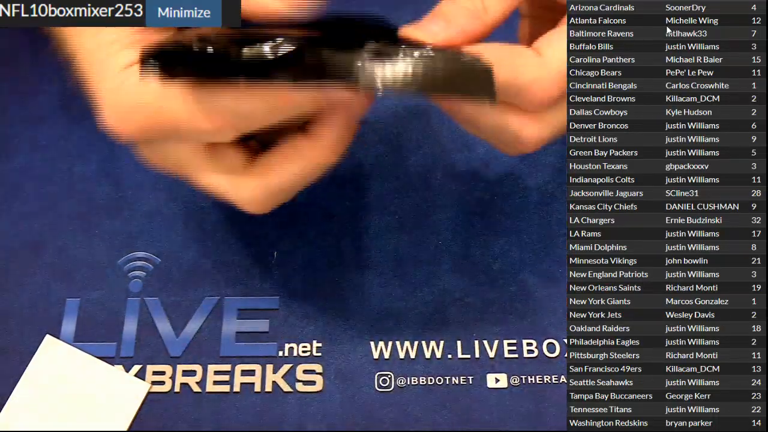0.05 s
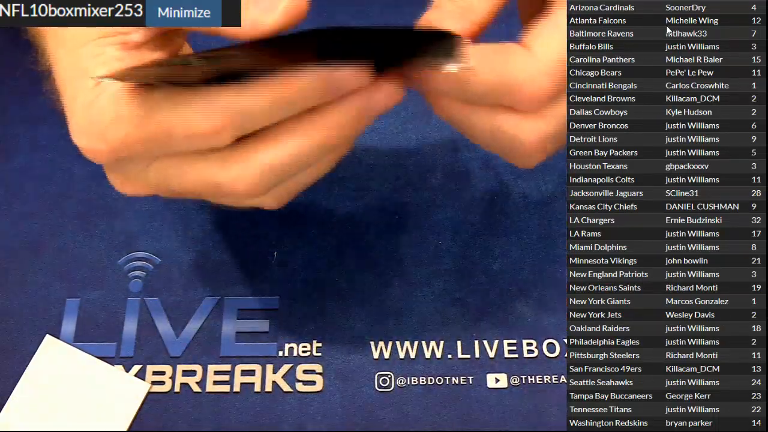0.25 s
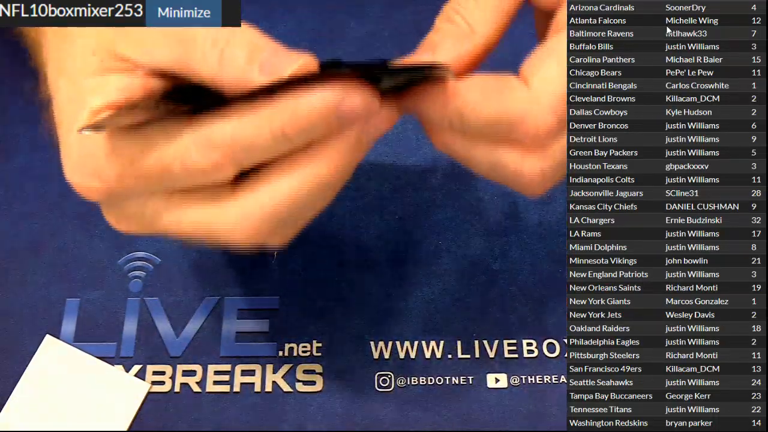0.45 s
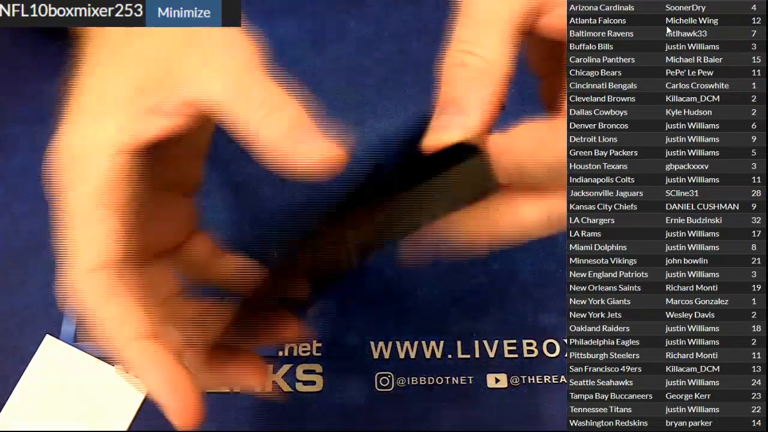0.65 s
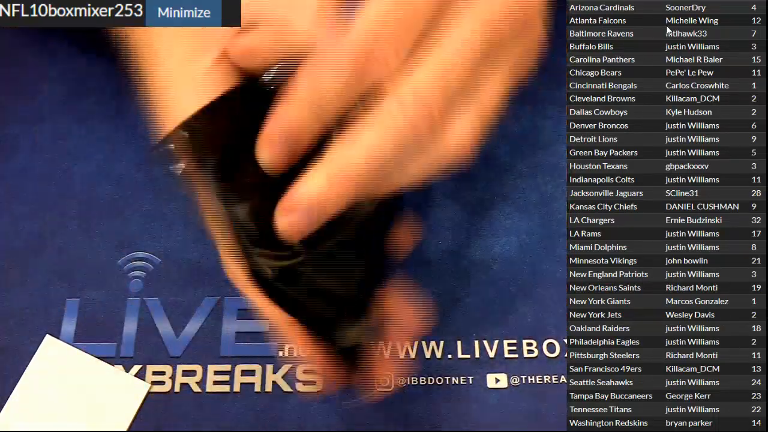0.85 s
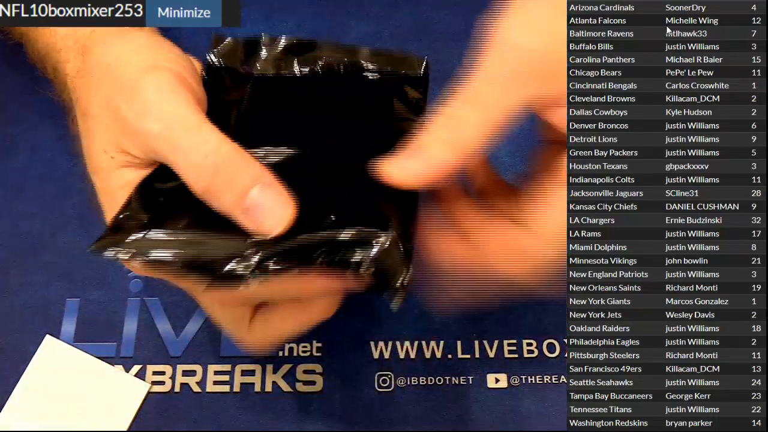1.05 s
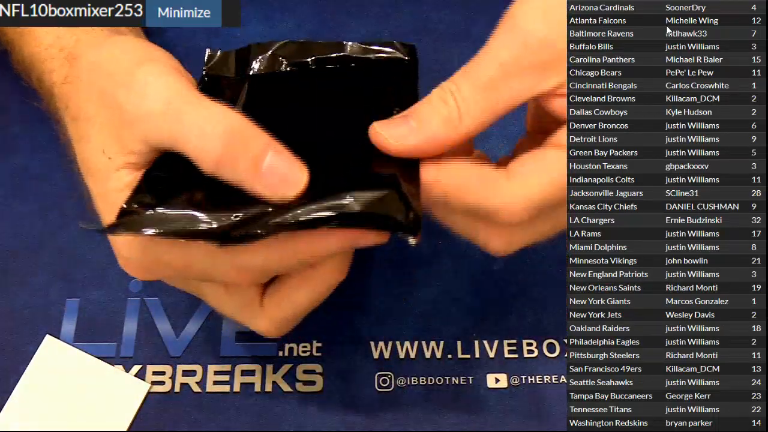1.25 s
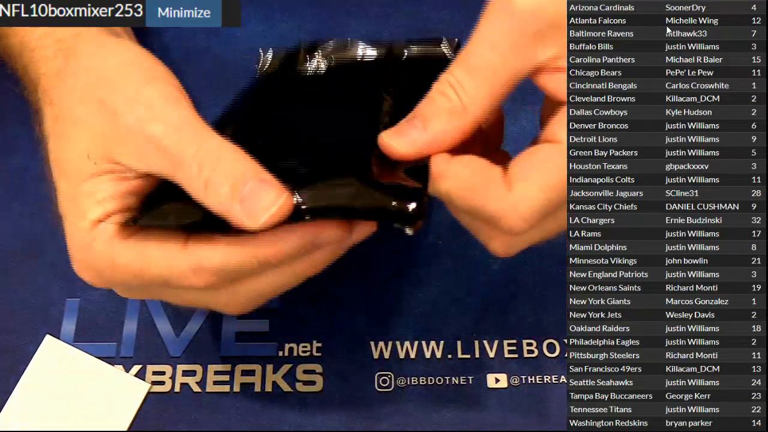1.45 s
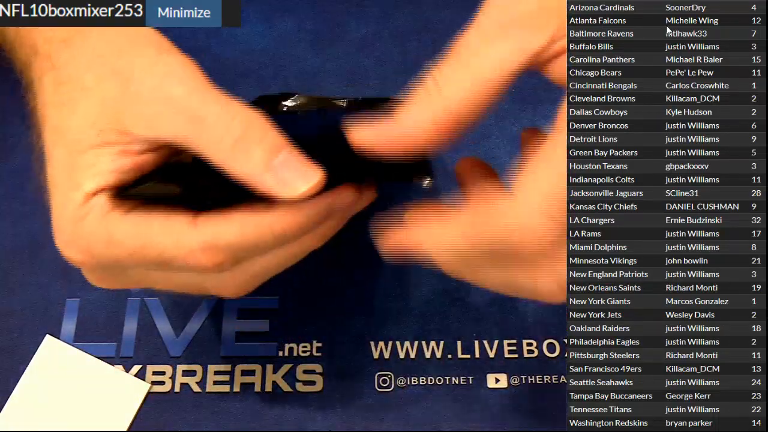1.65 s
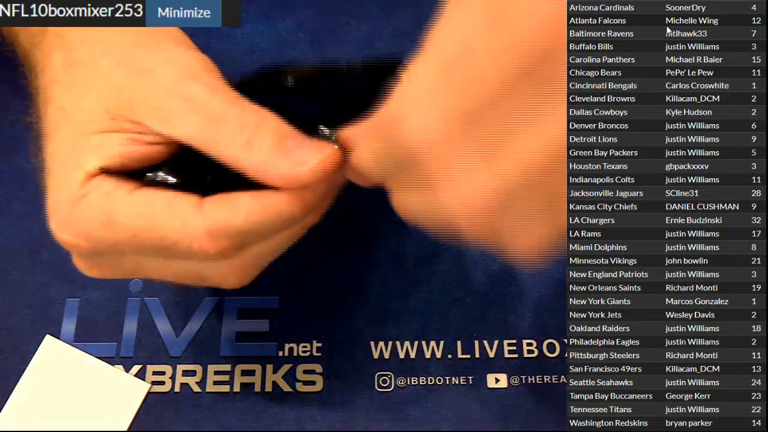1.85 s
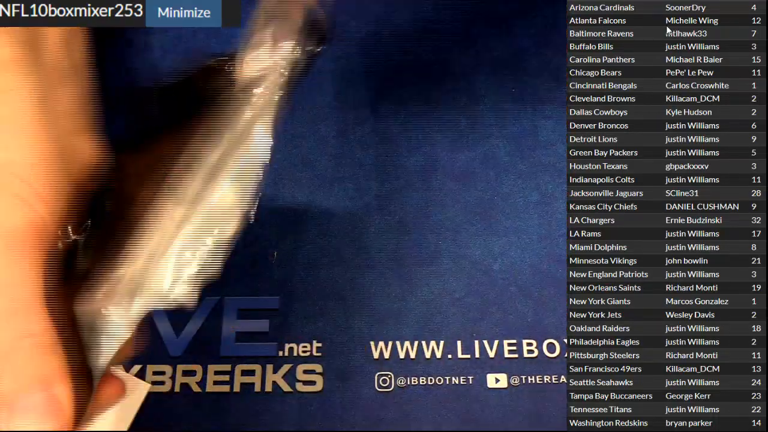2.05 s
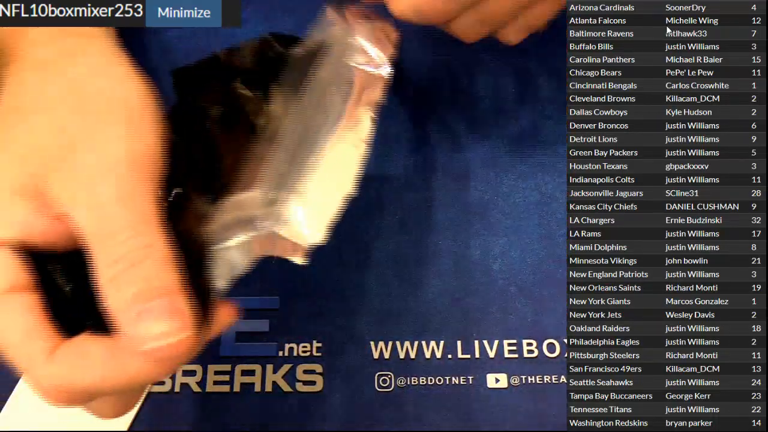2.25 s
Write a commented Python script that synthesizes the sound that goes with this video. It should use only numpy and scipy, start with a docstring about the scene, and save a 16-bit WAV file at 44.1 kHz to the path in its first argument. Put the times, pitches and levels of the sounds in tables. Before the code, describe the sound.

Hands flex and tear a crinkly foil wrapper: light crackles first, a loud cluster of snaps, a quieter lull, then a brisk rip and a fading end; soft bumps on a padded table, low hum, close indoor pickup.

```python
"""Foil pack torn open

Hands turn a small foil pack over a padded table and tear it open, close by in a quiet room.
Creases snap as noise bursts through resonances, over a crackle of tiny decaying sine ticks and a dull rub.
Wrists and pack bump the table, whose low modes ring; a hum and noise-made room air lie under it."""
import sys
import numpy as np
from scipy import signal
from scipy.fft import rfft, irfft
from scipy.io import wavfile
from scipy.ndimage import uniform_filter1d

SR = 44100
rng = np.random.default_rng(int(sys.argv[2]) if len(sys.argv) > 2 else 0)


def inscribe(sig):
    """Save sig as 16-bit PCM at rate SR to the path in sys.argv[1].

    A 1-D sig is mono; a 2-D sig holds one channel per row.
    Samples are clipped to [-1, 1] before scaling.
    """
    pcm = np.round(np.clip(np.atleast_2d(sig).T, -1, 1) * 32767)
    wavfile.write(sys.argv[1], SR, pcm.astype(np.int16))


N = 101429  # samples, 2.3 s

# crease snaps
RING_Q = 2.83  # of each of the two resonances in a row
BROAD_DB, BROAD_SPAN = -0.5, 4.3  # body against ring; the body reaches down to pitch / BROAD_SPAN
CLICK = 3.24  # height of the click fed in with the noise
RISE_MS, DECAY_MS, DECAY_CYCLES = 0.098, 1, 2  # the cycles make low creases rattle longer
SPLIT_HZ, TOP_HZ = 4800, 12500  # edges of the treble spit
# crackle and rubbing
STROKE_RISE_SHARE, RUB_RISE_SHARE, STROKE_FALL_S = .32, .45, .021  # each swells over a share of the stroke
DENSE_DB, SPARSEST = -39, .13  # level of full density; smallest share of it
FIZZ_HZ = 9000  # ticks above this weaken in light strokes
GRAINS_PER_S = 11000  # at full density
SPREAD_DB, CYCLES = 2.8, 2.4  # spread of the tick sizes; decay of a tick in cycles
CLUMP_DB, RUB_LUMP_DB = 2.2, 1.06  # rms unevenness of crackle and rubbing
# room, background and treble limits
ROOM_DB = -9.5
MAINS_HZ, MAINS_DB, AIR_DB = 59.5, -49, -54
MIC_TOP_HZ, EDGE_HZ = 15500, 16550


def amp(db):
    """Decibels to a linear gain."""
    return 10 ** (np.asarray(db) / 20)


def evened(x):
    """Scales x to an rms of 1."""
    return x / np.sqrt(np.mean(x ** 2) + 1e-20)


def read(points, hz):
    """Reads a table of (hz, value) along a log frequency axis."""
    f, value = np.transpose(points)
    return np.interp(np.log(hz + 1), np.log(f + 1), value)


def add(mix, s, sound):
    """Adds a sound to the mix at s seconds, cut at the end of the mix."""
    part = mix[round(s * SR):][:len(sound)]
    part += sound[:len(part)]


def colour(x, spectrum):
    """Shapes x by a spectrum table of (hz, gain_db)."""
    gain = amp(read(spectrum, np.fft.rfftfreq(len(x), 1 / SR)))
    return irfft(rfft(x) * gain, len(x))


def resonate(x, hz, width):
    """A one-pole complex resonance of about unit gain; width in Hz."""
    pole = np.exp((2j * np.pi * hz - np.pi * width) / SR)
    return 2 * signal.lfilter([1 - abs(pole)], [1, -pole], x).real


def snaps():
    """Each crease clicks and rattles for a few ms: a ring of the foil patch, a broad body and a treble spit."""
    # single creases snapping: start_s, level_db (peak), pitch_hz (ring), treble_db (spit against ring)
    creases = [(.021, -35.5, 3050, -9), (0.042, -32, 1140, 10.5), (.197, -30.5, 2480, -5),
               (0.2578, -23, 7200, 7), (0.2853, -21, 4830, 4.5), (0.3356, -25.5, 3220, -34),
               (0.5164, -25, 740, -16), (0.583, -34, 3570, -1), (.6184, -26.5, 3200, -26),
               (.6432, -22, 4170, -4), (.65, -26.5, 1780, -33), (.675, -12, 4860, -19),
               (0.6769, -18, 2680, -31), (0.678, -23.5, 784, -40), (.7, -29, 3000, 6),
               (0.7104, -22.5, 2230, 3), (.722, -22, 3340, -1), (0.776, -23, 5830, -6),
               (0.7851, -14.5, 4500, 0), (0.8372, -24.5, 3160, 5), (.8625, -27, 2120, -5),
               (0.8918, -11.5, 7600, -23), (0.9398, -13, 3150, -18), (.9415, -13, 1840, -29),
               (.977, -32.5, 9000, 8), (1.1823, -24, 3900, 1.5), (1.2057, -18.5, 1290, -31),
               (1.23, -23.5, 3340, -9), (1.346, -36, 6900, -8), (1.369, -35, 1917, -9),
               (1.377, -34, 6860, 17.5), (1.396, -38, 8600, 4), (1.4831, -30, 4200, -18),
               (1.51, -39.5, 1720, -17), (1.616, -30, 4460, -34), (1.6233, -35.5, 1750, -3),
               (1.6548, -31, 1980, -6), (1.72, -35, 1500, -18), (1.736, -25, 1520, 10),
               (1.7928, -26, 5200, -3), (1.8078, -23, 1490, -33), (1.8207, -21.5, 4600, -20),
               (1.825, -19.5, 1620, -22), (1.866, -15.5, 2800, -1.5), (1.873, -16.5, 6900, -17),
               (1.8898, -16.5, 3440, -5), (1.9062, -22, 2000, -14), (1.9096, -11.5, 5700, -13),
               (1.9163, -19, 8700, -14), (1.953, -11.5, 5200, 3), (1.9631, -17.5, 4940, 5),
               (1.9742, -16, 5260, 0), (1.9843, -16.5, 6150, 0), (2.0511, -19.5, 5950, -8),
               (2.1034, -26, 2960, -7), (2.1696, -20.5, 7500, -16)]
    out, t_ms = np.zeros(N), np.arange(1323) / SR * 1000
    click = CLICK * (np.arange(len(t_ms)) == 8)
    treble = signal.butter(2, [SPLIT_HZ, TOP_HZ], "band", fs=SR)
    noises = rng.standard_normal((len(creases), len(t_ms)))
    for (start_s, level_db, hz, treble_db), noise in zip(creases, noises):
        decay_ms = DECAY_MS + DECAY_CYCLES * 1000 / hz
        burst = noise * (1 - np.exp(-t_ms / RISE_MS)) * np.exp(-t_ms / decay_ms) + click
        ring = resonate(resonate(burst, hz, hz / RING_Q), hz, hz / RING_Q)
        broad = signal.butter(2, [hz / BROAD_SPAN, max(SPLIT_HZ, hz)], "band", fs=SR)
        body = signal.lfilter(*broad, burst)
        spit = signal.lfilter(*treble, burst)
        sound = evened(ring) + amp(BROAD_DB) * evened(body) + amp(treble_db) * evened(spit)
        add(out, start_s, amp(level_db) * sound / abs(sound).max())
    return out


def strokes():
    """Envelopes of crackle and rubbing as fingers flex and tear: each stroke rises, holds and dies."""
    # finger strokes on the foil: start_s, length_s, fine_db (crackle), dull_db (rubbing)
    flexes = [(-0.005, 0.078, -48.5, -56), (0.189, 0.082, -43.5, -38.5), (0.447, 0.044, -45, -42.5),
              (0.496, 0.091, -53, -49), (0.652, 0.097, -44.5, -46), (0.767, 0.018, -45, -39.5),
              (0.832, 0.039, -45, -53), (.886, 0.012, -36, -24.5), (0.933, 0.021, -38, -29.5),
              (1.108, 0.037, -44.5, -43.5), (1.198, 0.043, -41.5, -40), (1.317, 0.11, -56.5, -56.5),
              (1.462, 0.061, -57.5, -60.5), (1.684, 0.077, -49.5, -56), (1.8, 0.12, -34, -41.5),
              (1.954, 0.023, -29, -35), (2.022, 0.1, -52.5, -68), (2.283, 0.027, -58.5, -56.5)]
    t, out = np.arange(N) / SR, np.zeros((2, N))
    rise_share = np.array([[STROKE_RISE_SHARE], [RUB_RISE_SHARE]])
    for start_s, length_s, fine_db, dull_db in flexes:
        rise = np.clip((t - start_s) / (rise_share * length_s), 0, 1)
        fall = np.exp(-np.maximum(t - start_s - length_s, 0) / STROKE_FALL_S)
        out += amp([[fine_db], [dull_db]]) * rise * fall
    return out


def crackle():
    """Foil buckles in many tiny ticks of random pitch and size; the duller rubbing is continuous noise."""
    # tone of the foil's crackle: frequency_hz, gain_db
    foil_tone = [(530, -45), (900, -16), (2190, -3), (5390, 0), (9090, -3), (12000, -6), (16500, -13)]
    # tone of the dull rubbing: frequency_hz, gain_db
    rub_tone = [(120, -69), (200, 1), (1400, 6), (1930, -1), (4000, -7.5), (9500, -29.5)]
    fine, dull = strokes()
    # light strokes crackle sparsely; fewer ticks are made larger to hold the level
    density = np.clip((fine / amp(DENSE_DB)) ** 1.5, SPARSEST, 1)
    struck = rng.random(N) < density * GRAINS_PER_S / SR
    size = amp(SPREAD_DB * np.minimum(rng.exponential(1, N), 4)) * struck / np.sqrt(density)

    ticks = np.zeros(N)
    kind = rng.integers(0, 24, N)
    for k, hz in enumerate(np.geomspace(700, 15000, 24)):
        cycle = np.arange(0, 5 * CYCLES, hz / SR)
        tick = np.exp(-cycle / CYCLES) * np.sin(2 * np.pi * cycle)
        tick = tick / np.linalg.norm(tick) * np.sqrt(hz)
        hits = size * (kind == k) * (density if hz > FIZZ_HZ else 1)
        ticks += signal.oaconvolve(hits, tick)[:N]

    # slow random level swings, smoothed over 200 and 150 samples
    lumps = amp(RUB_LUMP_DB * evened(uniform_filter1d(rng.standard_normal(N), 200)))
    ticks *= amp(CLUMP_DB * evened(uniform_filter1d(rng.standard_normal(N), 150)))
    rub = evened(colour(rng.standard_normal(N) * lumps, rub_tone))
    return evened(colour(ticks, foil_tone)) * fine + rub * dull


def bumps():
    """Wrists and pack knock the table: a rough, fading push rings its low modes."""
    # knocks: start_s, level_db (peak of all modes but the deepest), push_ms (decay), deep_db (extra on the deepest)
    knocks = [(0.215, -27.5, 63, -32), (0.242, -31, 56, -18), (0.46, -39, 89, -60), (0.676, -37, 4.7, -28),
              (0.729, -25.5, 39, -5), (0.888, -22, 20, -9.5), (0.937, -33.5, 55, 7.5),
              (1.117, -25.5, 26, 2), (1.207, -32, 44, 11.5), (1.896, -33, 6.4, -23), (1.957, -44, 7.6, -16)]
    # modes of the table, deepest first: pitch_hz, level_db, t60_s
    modes = [(30.1, 4.5, 0.93), (69.8, 4, 0.057), (119.1, 2, 0.16), (168, 3.5, 0.097), (236.6, -1.5, 0.11),
             (268.3, -10.5, 0.18), (374, -8.5, 0.11)]
    out, t = np.zeros(N), np.arange(SR) / SR
    noises = rng.standard_normal((len(knocks), SR))
    for (start_s, level_db, push_ms, deep_db), noise in zip(knocks, noises):
        u = t * 1000 / max(push_ms, 3)
        push = noise * u ** 0.083 * np.exp(-u)
        rings = []
        for hz, mode_db, t60 in modes:
            softened = resonate(push, hz, hz)
            ring = resonate(softened, hz, np.log(1000) / np.pi / t60)
            rings.append(amp(mode_db) * evened(ring))
        upper = sum(rings[1:])
        sound = amp(deep_db) * rings[0] + upper
        add(out, start_s, amp(level_db) * sound / abs(upper).max())
    return out


def room(x):
    """Reflections as sparse taps of random sign, each band dying at its own speed."""
    # decay of the room: frequency_hz, t60_s
    decay = [(200, 0.82), (1000, 0.49), (4000, 0.46), (12000, 0.26)]
    taps = np.zeros(SR // 2)
    at = np.arange(150, len(taps) - 8, 8)
    taps[at + rng.integers(0, 8, len(at))] = rng.choice([-1., 1.], len(at))
    hz, t, z = signal.stft(taps, SR, nperseg=256)
    t60 = np.maximum(read(decay, hz), .05)[:, None]
    tail = signal.istft(z * amp(-60 * t / t60), SR, nperseg=256)[1]
    return signal.fftconvolve(x, tail / np.linalg.norm(tail))[:N]


def background():
    """A steady mains sine and wavering lines of resonated noise over soft, coloured noise as room air."""
    # wavering hum lines: pitch_hz, level_db (rms), width_hz
    hum_lines = [(125.1, -60, 4.2), (163.1, -61.5, 1.33)]
    # tone of the room air: frequency_hz, gain_db
    air_tone = [(12, -36), (20, -3), (75, -10.5), (265, -18), (479, -29.5), (6170, -36), (13900, -51.5),
                (16500, -73)]
    lines = np.zeros(N)
    for hz, level_db, width_hz in hum_lines:
        line = resonate(rng.standard_normal(N + SR), hz, width_hz)[SR:]  # drop the build-up
        lines += amp(level_db) * evened(line)
    cycle = MAINS_HZ * np.arange(N) / SR + rng.random()
    mains = amp(MAINS_DB) * np.sqrt(2) * np.sin(2 * np.pi * cycle)
    air = amp(AIR_DB) * evened(colour(rng.standard_normal(N), air_tone))
    return mains + lines + air


def scene():
    """Foil with its room tail, table bumps and background, as one channel."""
    foil = snaps() + crackle()
    return (foil + amp(ROOM_DB) * room(foil) + bumps() + background())[None]


def record(dry):
    """A treble roll-off, then a steep band limit."""
    soft = signal.lfilter(*signal.butter(4, MIC_TOP_HZ, fs=SR), dry)
    limit = signal.firwin(255, EDGE_HZ, window=("kaiser", 9), fs=SR)
    return signal.oaconvolve(soft, limit[None], "same")


dry = scene()
out = record(dry)
inscribe(out)
```